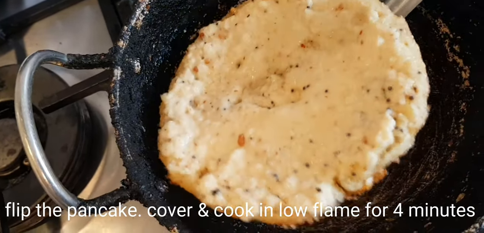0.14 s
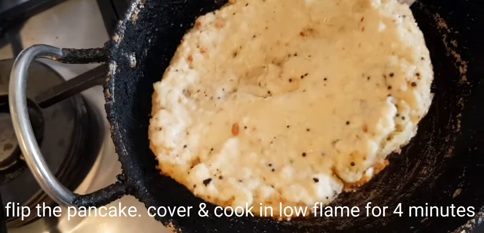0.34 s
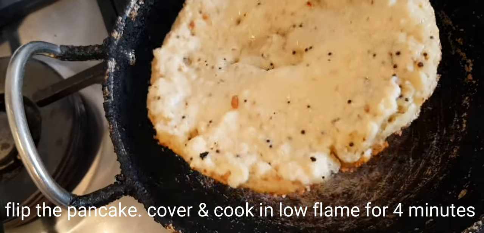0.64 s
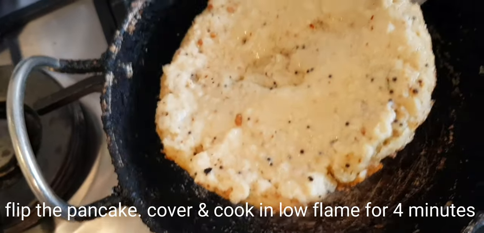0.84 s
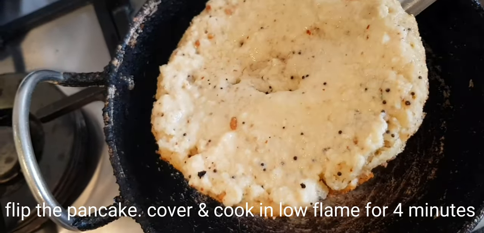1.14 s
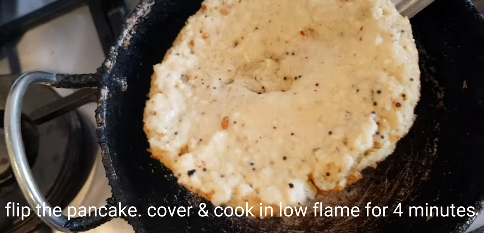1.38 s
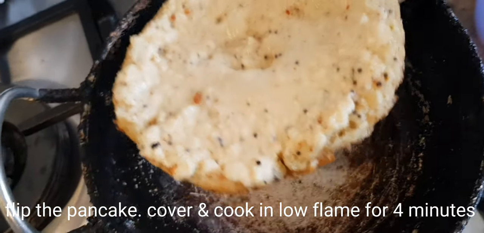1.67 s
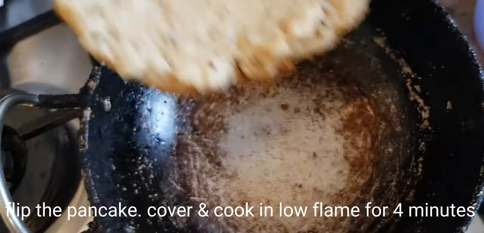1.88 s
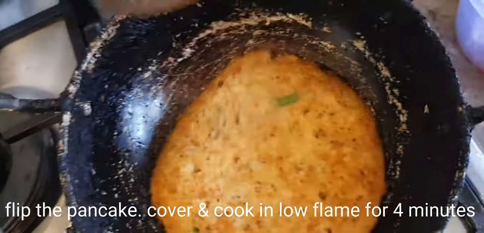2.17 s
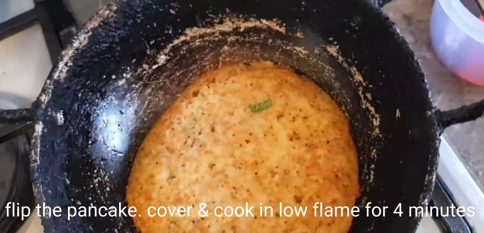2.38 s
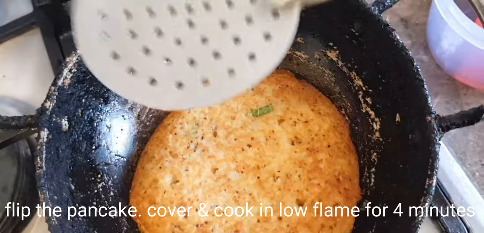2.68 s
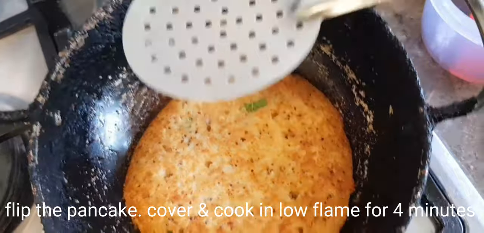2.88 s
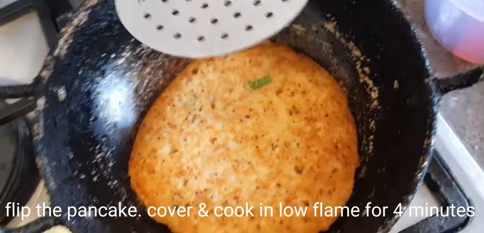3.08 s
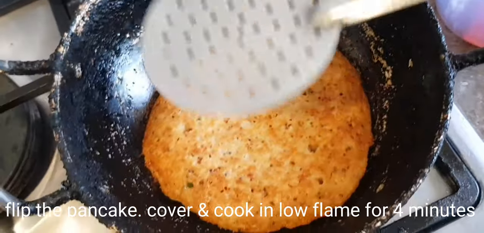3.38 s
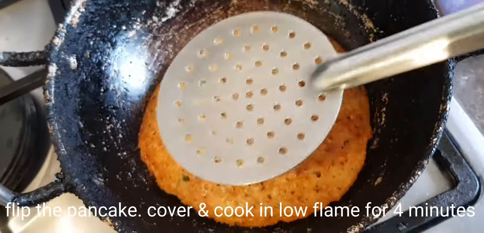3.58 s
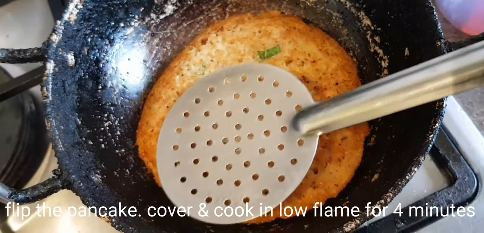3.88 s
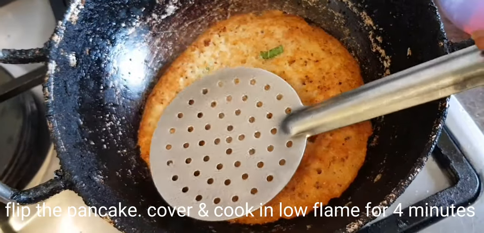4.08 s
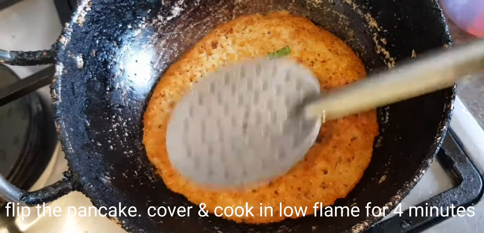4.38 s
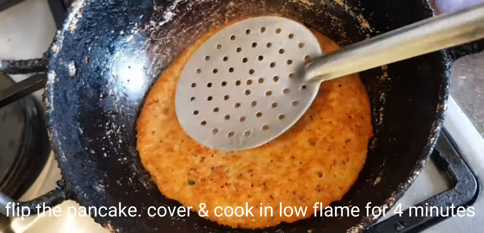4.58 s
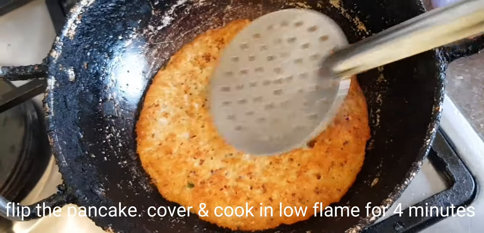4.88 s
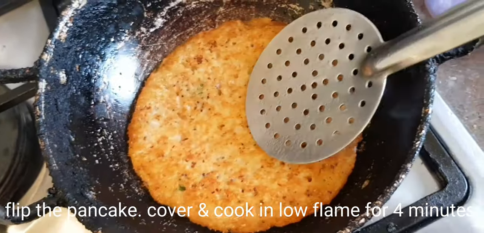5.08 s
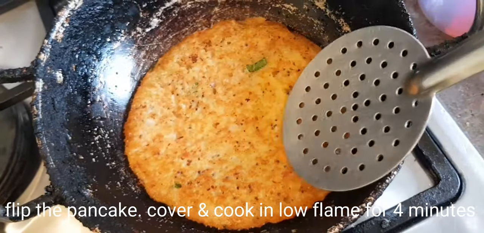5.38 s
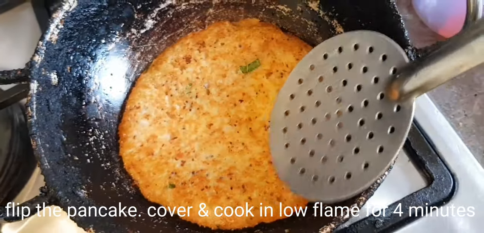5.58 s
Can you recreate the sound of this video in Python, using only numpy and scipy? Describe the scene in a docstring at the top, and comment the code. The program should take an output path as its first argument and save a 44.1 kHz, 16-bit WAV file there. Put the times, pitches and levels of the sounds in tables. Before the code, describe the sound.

A quiet stove hisses until a pancake thuds into hot oil; sharp frying erupts, dips, then rises to dense crackle under a metal skimmer.

```python
"""A pancake frying in an iron pan

A thick pancake is lifted from a deep pan over a hissing gas ring; loud sizzling starts abruptly, with thumps.
The batter sizzles as grainy noise, with ringing ticks for single droplets and noise snaps for spits of fat.
While the skimmer presses the cake, a hollow roar near one kilohertz grows: noise coloured by the bowl.
Blows set tuned resonances ringing; brushes, gas hiss and the low kitchen rumble are shaped noise."""
import sys
import numpy as np
from scipy import signal
from scipy.fft import rfft, irfft
from scipy.io import wavfile

SR = 44100
rng = np.random.default_rng(int(sys.argv[2]) if len(sys.argv) > 2 else 0)


def inscribe(sig):
    """Save sig as 16-bit PCM at rate SR to the path in sys.argv[1].

    A 1-D sig is mono; a 2-D sig holds one channel per row.
    Samples are clipped to [-1, 1] before scaling.
    """
    pcm = np.round(np.clip(np.atleast_2d(sig).T, -1, 1) * 32767)
    wavfile.write(sys.argv[1], SR, pcm.astype(np.int16))


N = 253134  # samples, about 5.7 s

# How strongly the batter fries, from its sudden start on: t/s, level/dB
SIZZLE_LEVEL = [(2.344, -25), (2.4, -24.5), (2.5, -29), (2.75, -31.5), (2.95, -35.5), (3.2, -38),
                (3.42, -38), (3.5, -35), (3.58, -37), (3.64, -37.5), (3.69, -36), (3.74, -37.5), (3.8, -38),
                (3.93, -39.5), (3.97, -37), (4.01, -41.5), (4.1, -36), (4.22, -37), (4.33, -26.5),
                (4.45, -26), (4.56, -28), (4.66, -28.5), (4.76, -27.5), (4.83, -23.5), (4.9, -21.5),
                (4.96, -23.5), (5.02, -26), (5.07, -30.5), (5.135, -27), (5.22, -29), (5.3, -28.5),
                (5.39, -25.5), (5.5, -30.5), (5.6, -28), (5.72, -25.5)]
# Colour of the fine fizz: f/Hz, level per Hz/dB
FIZZ_COLOUR = [(1300, -23), (1800, -7.5), (2100, -10.5), (2850, -2.5), (3300, -5.5), (4700, -3), (6000, -7),
               (8500, -5), (11500, 0), (13500, -3), (17000, 0)]
# Colour of the hollow roar in the bowl of the pan: f/Hz, level per Hz/dB
BOWL_COLOUR = [(300, -13), (430, -15), (580, -5), (665, -18), (735, -1), (820, -4), (890, 7.5), (955, 3.5),
               (1030, 7.5), (1100, 4), (1200, -3), (1310, -1), (1420, -2.5), (1580, -8), (1750, -9),
               (2200, -47)]
# The loudest spits of fat: t of the peak/s, peak level/dB, lower edge f/Hz, rise time/ms
SPITS = [(0.0513, -29, 4000, .25), (0.328, -29, 3000, .7), (2.3446, -21, 5000, .6), (2.5467, -18, 9000, .4),
         (2.9245, -18, 6500, .5), (2.9454, -15, 7500, .25), (3.1098, -23, 8000, .15),
         (3.1361, -23, 8000, .15), (3.235, -25, 7000, .4), (3.2707, -24, 10000, .3),
         (3.3539, -20, 8000, .25), (3.3799, -23.5, 9000, .15), (3.468, -27, 8000, .5),
         (3.4772, -24, 8500, .3), (3.4854, -18, 4000, .25), (3.4915, -25, 8000, .3),
         (3.5304, -24, 9000, .15), (3.5404, -23, 9000, .3), (3.6303, -27, 6000, 1.8),
         (3.6592, -17, 5000, .3), (3.6688, -18, 10500, .3), (3.6782, -20, 5000, .2),
         (3.7343, -26, 8500, .4), (3.7789, -22, 4500, 1.1), (3.8295, -27, 7000, 1.0),
         (3.8424, -24.5, 5000, .25), (3.9061, -26, 8000, .2), (3.9142, -26, 5000, .4),
         (3.9173, -22.5, 5000, .3), (3.9534, -14.5, 4000, .2), (3.9741, -25, 6000, .2),
         (4.103, -23.5, 8000, .4), (4.151, -25, 7000, 1.0), (4.1568, -25, 9500, .3), (4.228, -24, 7000, .3),
         (4.6896, -17, 7000, .6), (4.7103, -15.5, 6000, .9), (4.7836, -16, 7000, .15),
         (4.8265, -12.5, 6500, .15), (5.1392, -15, 7000, .4)]
# Blows on the pan, levels relative within each column:
# t/s, shove level/dB, knock level/dB, knock hardness/dB per octave, stove rumble level/dB
BLOWS = [(.327, -58, -44.5, 7, -32), (0.371, -42.5, -53.5, 10, -17), (2.354, -24, -36.5, 3, -3),
         (2.3941, -6.5, -19, 8.5, -6), (2.4067, -14.5, -33.5, -17.5, -17), (2.4449, -18, -43, 24.5, -20),
         (2.4578, -13, -32.5, -15, -13), (2.4951, -19, -50, 26, -11), (2.556, -34, -44, 3, -6),
         (4.7089, -27, -36, -1, -2.5), (4.758, -33, -38, 0, -22), (4.798, -39, -62, -6, -33),
         (4.832, -36, -52, -5, -24), (5.541, -43, -42.5, -1, -40), (5.6, -43, -48, 5, -37)]
# Low resonances of the pan on its grate: f/Hz, relative level/dB, time to fade 60 dB/s
BOOM_MODES = [(73.8, -16.5, 0.3), (126.4, -1, 0.25), (149.1, -1, 0.28), (160, -16.5, 0.072)]
# Higher resonances of the pan on its grate: f/Hz, relative level/dB, time to fade 60 dB/s
CLATTER_MODES = [(188, 0, 0.15), (297.3, 3.5, 0.16), (338.5, -1.5, 0.46), (376.7, -5, 0.31),
                 (509.5, 2.5, 0.088), (660, -20, 0.16), (732, -0.5, 0.11), (800, -3, 0.072),
                 (900, 1, 0.056), (1003, -7, 0.086)]
# The skimmer brushes the pan: t/s, rms level before the fade/dB, centre f/Hz, width/Hz, length scale/s
SCUFFS = [(.05, -48.5, 1400, 700, 0.0059), (0.075, -49, 1596, 50, 0.044), (0.09, -52, 930, 200, 0.16),
          (0.326, -42, 1000, 1100, 0.0074), (0.897, -55.5, 990, 800, 0.029),
          (1.045, -52.5, 1200, 1000, 0.014), (1.05, -55, 990, 900, 0.13)]
# Strength of the gas ring: t/s, level/dB
GAS_LEVEL = [(0, -48), (.4, -45.5), (1.2, -47.5), (2.34, -48.5), (5.74, -58)]
# Colour of the gas hiss: f/Hz, level per Hz/dB
HISS_COLOUR = [(300, 0.5), (380, -6), (900, 4.5), (1450, -1.5), (2000, 3), (2500, -2.5), (3000, 0.5),
               (3500, 0.5), (4100, 3.5), (5000, 1.5), (8000, 1.5), (12000, 6), (17000, 1.5)]
# Broad whistles of the gas jets: f/Hz, width/Hz, height added to the hiss colour/dB
JET_WHISTLES = [(1720, 110, 8), (2010, 100, 8), (4620, 240, 8.5), (7400, 260, 6.5), (11100, 120, 3),
                (14600, 200, 4)]
# Strength of the kitchen rumble: t/s, level/dB
RUMBLE_LEVEL = [(0, -51.5), (.5, -51), (2.335, -52), (2.345, -54), (3.1, -57), (4.6, -57), (5.74, -52.5)]
# Colour of the kitchen rumble: f/Hz, level per Hz/dB
RUMBLE_COLOUR = [(12, -64), (20, -25), (45, -7), (72, 1), (97, -4.5), (125, -0.5), (148, -1.5),
                 (174, -17.5), (198, -10), (231, -20), (263, -14), (325, -18.5), (370, -42), (450, -63),
                 (580, -51), (990, -120)]
# How alike the noise is at the left and right microphone ports: f/Hz, likeness/0 to 1
PORT_LIKENESS = [(60, .98), (150, .99), (300, .9), (600, .86), (1000, .8), (1600, .45), (2500, .25),
                 (15000, .2)]
# Balance of the noise between the ports: f/Hz, left minus right level/dB
PORT_LEAN = [(60, 1.5), (150, 1.5), (380, -1.0), (950, 4.0), (2380, 1.0), (5980, 0.0), (15000, 1.0)]

CUTOFF_HZ = 15550
HZ = np.maximum(np.arange(N // 2 + 1) * SR / N, 1)  # frequency of every spectrum bin
RIGHT_LAG_S = 0.00013
# Bubbles of four sizes, each heard mostly in a band of its own; parts of the roar waver each on its own
FIZZ_PARTS_HZ = [2700, 4050, 8100, 13500]
BOWL_PARTS_HZ, BOWL_WAVER_DB, BOWL_WAVER_PER_S = [740, 900, 1050, 1350], 2.2, 9
# A thin sizzle is grainier than a dense one
DENSE_GRAIN_DB, THIN_GRAIN_DB, THIN_BELOW_DB = 3.2, 4.4, -32
SHARED_BURSTS = 0.4  # share of the bursts that span all bands
# The skimmer presses the cake into the bowl, then eases off
PRESSED_S, PRESS_RISE_S, LIFTED_S, LIFT_FALL_S = 3.93, 0.34, 5.35, 0.37
# Roar levels when the sizzle is at ROAR_AT_DB; ROAR_FOLLOWS is its share of the sizzle's swing
ROAR_AT_DB, ROAR_FREE_DB, ROAR_PRESSED_DB, ROAR_FOLLOWS = -30, -45.5, -41.5, 0.92
# Droplet ticks: typical rate, height against the sizzle level, spread of heights
CRACKLE_PER_S, CRACKLE_DB, CRACKLE_SPREAD_DB = 700, 3, 5
CRACKLE_FADE_CYCLES, CRACKLE_LOW_HZ = 2.8, 5000  # cycles to fade 60 dB, lower edge
SPIT_LEAN_DB, SPIT_SCATTER_DB = 0.8, 1.2  # left minus right, and its spread
# Fine spray after the snap; duller body below the edge; the pop at its top
SPRAY_MS, SPRAY_DB, SPIT_BODY_DB, SPIT_POP_DB = 7, -20, -12, 5


def sizzle():
    """Steam bubbles burst in clumps: short flares on finer fizz, with a hollow roar in the bowl."""
    sizzle_db, = in_time(SIZZLE_LEVEL)
    grain_db = np.where(sizzle_db < THIN_BELOW_DB, THIN_GRAIN_DB, DENSE_GRAIN_DB)
    chance = 480 * from_db(2.0 * drift(12)) / SR  # typically 480 bursts per second
    shared = rng.random(N) < SHARED_BURSTS * chance
    separate = rng.random((4, N)) < (1 - SHARED_BURSTS) * chance
    bursts = shared | separate
    sizes = from_db(grain_db * np.minimum(rng.exponential(1, N), 1.7)) - 1
    fade = np.exp(-1 / (0.00035 * SR))  # each flare dies in about a third of a millisecond
    flares = signal.lfilter([1], [1, -fade], bursts * sizes + 1e-18)
    band_waver_db = np.array([0.91 * drift(41) for band in flares])
    seethe = from_db(0.27 * grain_db * drift(20) + band_waver_db)
    fizz = from_db(sizzle_db) * wide_noise(closed(FIZZ_COLOUR), seethe * (1 + 0.7 * flares))

    bowl_db, = in_time([(PRESSED_S, ROAR_FREE_DB), (PRESSED_S + PRESS_RISE_S, ROAR_PRESSED_DB),
                        (LIFTED_S, ROAR_PRESSED_DB), (LIFTED_S + LIFT_FALL_S, ROAR_FREE_DB)])
    waver = from_db([BOWL_WAVER_DB * drift(BOWL_WAVER_PER_S) for part in BOWL_PARTS_HZ])
    roar_grains = seethe[0] * (1 + 0.63 * flares[0]) * waver
    roar_db = bowl_db + ROAR_FOLLOWS * (sizzle_db - ROAR_AT_DB)
    roar = from_db(roar_db) * wide_noise(closed(BOWL_COLOUR), roar_grains, BOWL_PARTS_HZ)
    return (fizz + roar) * after_sizzle_starts()


def crackle():
    """Single droplets tick in clumps: random clicks set very short treble tones ringing."""
    sizzle_db, = in_time(SIZZLE_LEVEL)
    heights_db = CRACKLE_SPREAD_DB * np.minimum(rng.exponential(1, N), 3)
    sizes = from_db(heights_db) * rng.choice([-1, 1], N)
    ticks = sizes * (rng.random(N) < CRACKLE_PER_S * from_db(4 * drift(12)) / SR)
    pitches = np.geomspace(5500, 14500, 8)
    dealt = rng.integers(0, 8, N)  # which pitch each tick gets
    out = np.zeros((2, N))
    for k, hz in enumerate(pitches):
        rung = ring(ticks * (dealt == k), hz, CRACKLE_FADE_CYCLES / hz)
        out += [rung, np.roll(rung, rng.integers(1, 9))]  # right lags by 1 to 8 samples
    high_pass = signal.butter(2, CRACKLE_LOW_HZ, "high", fs=SR, output="sos")
    thin = signal.sosfilt(high_pass, out)
    return thin * from_db(sizzle_db + CRACKLE_DB) * after_sizzle_starts()


def spits():
    """Each spit of fat is a bright snap of noise that swells and dies within milliseconds."""
    out = np.zeros((2, N + 2048))
    ms = np.arange(2048) / SR * 1000
    draws = rng.standard_normal((len(SPITS), 4097))
    for (s, db, low_hz, rise_ms), row in zip(SPITS, draws):
        swell = ms / rise_ms * np.exp(1 - ms / rise_ms)
        spray = from_db(SPRAY_DB) * np.exp(-ms / SPRAY_MS)
        pan_db = SPIT_LEAN_DB + SPIT_SCATTER_DB * row[0]
        mid, side = row[1:].reshape(2, -1)
        burst = (mid + 0.6 * side * np.array([[1], [-1]])) * (swell + spray)
        burst[:, round(rise_ms * SR / 1000)] = from_db(SPIT_POP_DB)
        bright_band = signal.butter(3, [low_hz, CUTOFF_HZ], "band", fs=SR, output="sos")
        body_band = signal.butter(2, [900, low_hz], "band", fs=SR, output="sos")
        body = from_db(SPIT_BODY_DB) * signal.sosfilt(body_band, burst)
        snap = signal.sosfilt(bright_band, burst) + body
        unit_snap = snap / np.abs(snap.mean(0)).max()
        i = round((s - rise_ms / 1000) * SR)
        out[:, i:i + 2048] += unit_snap * from_db(db + np.array([[pan_db / 2], [-pan_db / 2]]))
    return out[:, :N]


def blows():
    """Soft dough pushes the pan: a slow shove rings low modes, a quicker knock higher ones; the stove rumbles."""
    s, shove_db, knock_db, hardness_db, stove_db = np.transpose(BLOWS)
    at = np.round(s * SR).astype(int)
    shove, knock, shake, hardness = np.zeros((4, N))
    shove[at], knock[at], shake[at] = from_db([shove_db, knock_db, stove_db])
    hardness[at] = hardness_db
    soft = signal.lfilter(*signal.butter(2, 300, fs=SR), shove)
    boom, clatter = np.zeros((2, N))
    # neighbouring modes start in opposition, so the boom swells, dips and swells again
    for k, (hz, db, t60) in enumerate(BOOM_MODES):
        boom += (-1) ** k * from_db(db) * ring(soft, hz, t60)
    for k, (hz, db, t60) in enumerate(CLATTER_MODES):
        hit = knock * from_db(db + hardness * np.log2(hz / 500))  # hard knocks favour high modes
        clatter += (-1) ** k * ring(hit, hz, t60)
    rung = signal.lfilter(*signal.butter(2, 50, "high", fs=SR), boom + from_db(-9.5) * clatter)
    # both colours below: f/Hz, level per Hz/dB
    rustle_colour = [(190, 13.5), (330, 9.0), (600, 10.0), (1000, -8), (1500, 0.0), (4500, -1.5)]
    stove_colour = [(50, -6), (64, -14), (76, 0.0), (100, -8.5), (140, -21.0), (165, -22),
                    (193, -16.0), (230, -15)]
    rustle = dying(knock, 0.26) * wide_noise(closed(rustle_colour))
    stove = dying(shake, 0.4) * wide_noise(closed(stove_colour))
    ringing = rung * from_db([[1], [-1]])  # 1 dB up on the left, 1 dB down on the right
    return ringing + from_db(-4.5) * rustle + from_db(-31.0) * stove


def scuffs():
    """Short dry brushes of the skimmer: noise in one resonance under a quick rise and fall."""
    out = np.zeros(N)
    noise = rng.standard_normal((len(SCUFFS), 8192))
    for (s, db, hz, width_hz, length), row in zip(SCUFFS, noise):
        t = np.arange(8192) / SR / length
        brush = rms_one(signal.lfilter(*signal.iirpeak(hz, hz / width_hz, fs=SR), row))
        i = round(s * SR)
        out[i:i + 8192] += from_db(db) * brush * np.minimum(8 * t, 1) * np.exp(-2 * t ** 2)
    return out


def gas_ring():
    """Escaping gas: even hiss with broad faint whistles and a slight flutter."""
    whistles = sum(db / (1 + (2 * (HZ - hz) / width) ** 2) for hz, width, db in JET_WHISTLES)
    flutter = [from_db(0.9 * drift(18) + 0.9 * drift(11)) for band in range(4)]
    return from_db(in_time(GAS_LEVEL)[0]) * wide_noise(closed(HISS_COLOUR) + whistles, flutter)


def rumble():
    """Lumpy low noise of the kitchen; its low, middle and upper parts swell apart."""
    lumps = [from_db(2.0 * drift(6)) for part in range(3)]
    noise = wide_noise(closed(RUMBLE_COLOUR), lumps, [70, 130, 260])
    return from_db(in_time(RUMBLE_LEVEL)[0]) * noise


def from_db(db):
    """Turn decibels into a gain."""
    return 10 ** (np.asarray(db) / 20)


def rms_one(x):
    """Scale a sound to an rms (average strength) of 1."""
    return x / np.sqrt(np.mean(x ** 2) + 1e-20)


def in_time(rows):
    """Turn the columns of a table into curves over all samples."""
    s, *columns = np.transpose(rows)
    return [np.interp(np.arange(N) / SR, s, c) for c in columns]


def on_hz(points):
    """Read a table over log frequency at every spectrum bin."""
    hz, value = np.transpose(points)
    return np.interp(np.log(HZ), np.log(hz), value)


def closed(points):
    """Make a colour fall away by 40 dB in the octave beyond each end."""
    (low_hz, low_db), (high_hz, high_db) = points[0], points[-1]
    return on_hz([(low_hz / 2, low_db - 40), *points, (high_hz * 2, high_db - 40)])


def after_sizzle_starts():
    """A switch that is off before the sizzle suddenly starts and on from then."""
    return np.arange(N) >= SIZZLE_LEVEL[0][0] * SR


def drift(rate):
    """Slow random wandering with an rms of 1: noise smoothed around the given rate in Hz."""
    r = np.exp(-2 * np.pi * rate / SR)
    wander = signal.lfilter([1], [1, -2 * r, r * r], rng.standard_normal(N + SR))
    return rms_one(wander[SR:])  # the first second only settles the filter


def ring(clicks, hz, t60):
    """Each click sets a fading sine ringing; a unit click gives it a height of about 1."""
    r, w = from_db(-60 / (t60 * SR)), 2 * np.pi * hz / SR
    return signal.lfilter([0, np.sin(w)], [1, -2 * r * np.cos(w), r * r], clicks + 1e-18)


def dying(clicks, t60):
    """An envelope that jumps at each click and fades by 60 dB in t60 seconds."""
    return signal.lfilter([1], [1, -from_db(-60 / (t60 * SR))], clicks + 1e-18)


def wide_noise(colour_db, grains=(1,), parts_hz=FIZZ_PARTS_HZ):
    """Coloured noise, one grain curve per band; alike at both ports in the bass, hardly so in the treble."""
    centres = np.log(parts_hz)[:len(grains)]
    bands = 0
    for k, grain in enumerate(grains):
        share = np.interp(np.log(HZ), centres, np.arange(len(grains)) == k)
        bands = bands + rfft(grain * rng.standard_normal((2, N))) * np.sqrt(share)
    mid, side = bands * from_db(colour_db) * (HZ < 1.02 * CUTOFF_HZ)
    alike = np.clip(on_hz(PORT_LIKENESS), 0, 1)
    left = np.sqrt(1 + alike) * mid + np.sqrt(1 - alike) * side
    right = np.sqrt(1 + alike) * mid - np.sqrt(1 - alike) * side
    lean = from_db(on_hz(PORT_LEAN) / 2)
    late = np.exp(-2j * np.pi * HZ * RIGHT_LAG_S)  # the pan is nearer the left port
    return rms_one(irfft(np.array([left * lean, right / lean * late]), N))


def scene():
    """All sources together at the microphone."""
    return sizzle() + crackle() + spits() + blows() + scuffs() + gas_ring() + rumble()


def record(dry):
    """Cut the treble steeply above the cutoff."""
    return signal.sosfilt(signal.ellip(12, 0.5, 70, CUTOFF_HZ, fs=SR, output="sos"), dry)


dry = scene()
out = record(dry)
inscribe(out)
```